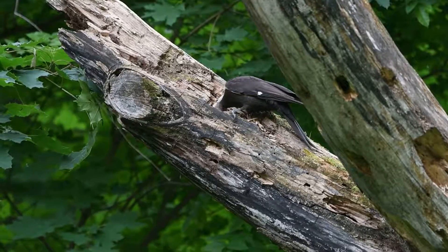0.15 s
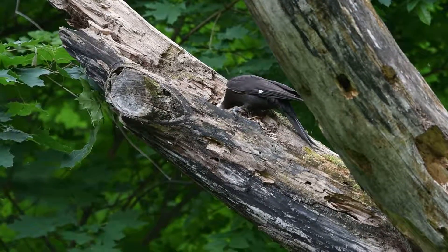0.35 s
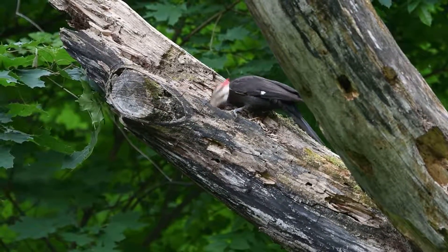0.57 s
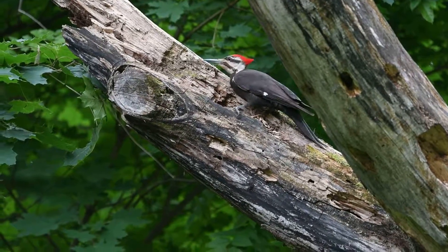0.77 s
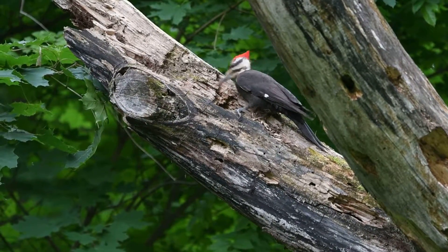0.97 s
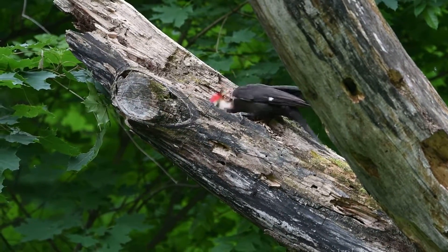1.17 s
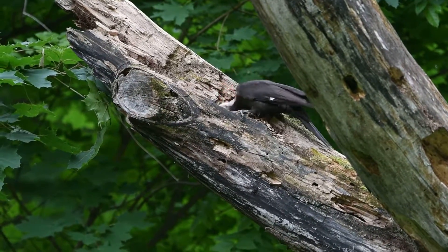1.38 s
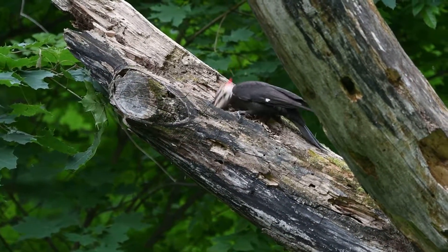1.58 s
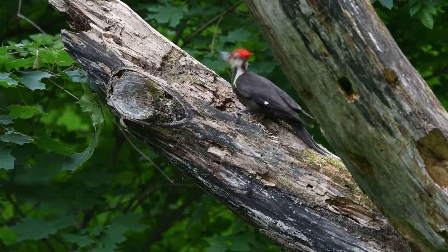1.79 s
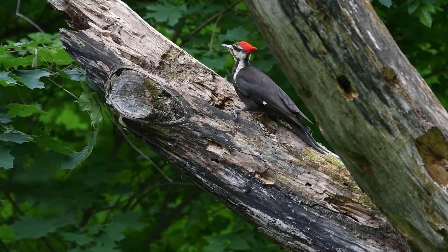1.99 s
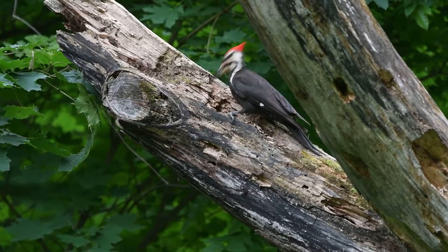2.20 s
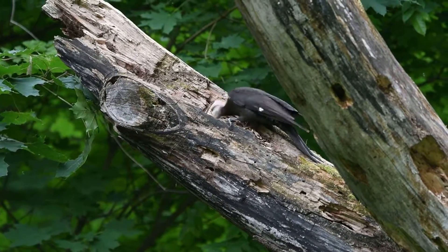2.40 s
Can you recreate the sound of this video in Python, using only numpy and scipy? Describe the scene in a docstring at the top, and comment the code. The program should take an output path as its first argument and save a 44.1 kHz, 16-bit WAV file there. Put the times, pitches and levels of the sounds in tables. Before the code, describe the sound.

Sparse, soft woodpecker pecks on dead wood follow a brief crackle and a much louder sharp snap, close on the right. Behind them lie quiet forest leaf hiss, a faint distant engine hum and thin bird whistles.

```python
"""Woodpecker on a dead trunk

In a quiet forest a woodpecker gives a hollow trunk one firm knock and a few light taps, prying at the
loose wood. Before that, something small and dry creaks and snaps right beside the right microphone.
Farther out lie a low rumble, a faint engine hum, leaf hiss and whistling birds."""
import sys
import numpy as np
from scipy import signal
from scipy.fft import rfft, irfft
from scipy.io import wavfile

SR = 44100
rng = np.random.default_rng(int(sys.argv[2]) if len(sys.argv) > 2 else 0)


def file_out(sig):
    """Save sig as 16-bit WAV at sys.argv[1]."""
    # one column per channel
    cols = np.atleast_2d(sig).T
    # limit, then scale
    lim = np.clip(cols, -1, 1)
    pcm = np.round(lim * 32767).astype(np.int16)
    wavfile.write(sys.argv[1], SR, pcm)


N = 108045

# echo among the trees (frequency [Hz], t60 [s])
FOREST_T60 = [(200, 0.12), (1500, 0.7), (6000, 0.42), (14000, 0.062)]


def amp(db):
    """Decibels to gain."""
    return 10 ** (np.asarray(db) / 20)


def unit(x):
    """Scales to rms 1."""
    return x / np.sqrt(np.mean(x ** 2) + 1e-20)


def read(points, hz):
    """Reads a table along log frequency."""
    f, value = np.transpose(points)
    return np.interp(np.log(hz + 1), np.log(f + 1), value)


def add(mix, start_s, sound):
    """Mixes a sound in at its start time."""
    part = mix[:, max(round(start_s * SR), 0):][:, :sound.shape[-1]]
    part += sound[..., :part.shape[1]]


def noise(tone, size):
    """Two unrelated channels of noise with the given tone, at rms 1."""
    hz = np.fft.rfftfreq(size, 1 / SR)
    return unit(irfft(rfft(rng.standard_normal((2, size))) * amp(read(tone, hz)), size))


def drift(rate_hz, size):
    """Random wandering of rms about 1."""
    hz = np.fft.rfftfreq(N, 1 / SR)
    return unit(irfft(rfft(rng.standard_normal(N)) * np.exp(-(hz / rate_hz) ** 2), N))[:size]


def strike(t, rise_s, decay_s):
    """Quick rise and exponential fall."""
    return (1 - np.exp(-t / rise_s)) * np.exp(-t / decay_s)


def mode(t, hz, t60, rise_s):
    """One struck resonance."""
    return strike(t, rise_s, t60 / np.log(1000)) * np.sin(2 * np.pi * hz * t)


def pecks(contact_rise_s=0.00037, thud_rise_s=0.0049):
    """The beak ticks on the surface, the dry outer wood clacks, and the hollow trunk thuds."""
    # beak on the trunk (time [s], tick [dB], clack [dB], thud [dB], thud brightness [dB/octave])
    blows = [(1.2108, -38.5, -45.5, -51, 15.5), (1.2159, -47.5, -55, -42, 4.5),
             (1.4100, -52, -43.5, -58.5, 6), (1.4453, -52, -53, -73, -8), (1.727, -53.5, -69, -58, 0),
             (1.798, -73, -66, -56.5, 11), (2.198, -72, -66, -59, 12), (2.3962, -54.5, -45.5, -58, 12)]
    # tone of the beak's tick (frequency [Hz], level [dB])
    tick_tone = [(300, -12), (700, -0.5), (1900, -2.5), (3400, 0.5), (4800, -4), (6300, 0.5), (9500, -10.5),
                 (12000, -20), (15000, -30)]
    # dry outer wood (frequency [Hz], level [dB], t60 [s])
    wood_modes = [(638, -4, 0.029), (1340, -8, 0.022), (1852, -3, 0.028), (2200, 0.5, 0.02)]
    # hollow trunk (frequency [Hz], level [dB], t60 [s])
    trunk_modes = [(270, 4.5, 0.11), (461.4, -5, 0.089), (501, 2.5, 0.061), (588, -8, 0.043)]
    out, t = np.zeros((2, N)), np.arange(SR // 6) / SR
    lowest_hz = trunk_modes[0][0]
    pan = amp([[-0.3], [0.3]])  # a hair right of centre
    for start_s, tick_db, clack_db, thud_db, tilt in blows:
        tick = amp(tick_db) * noise(tick_tone, len(t)) * strike(t, contact_rise_s, decay_s=0.0033)
        clack = sum(amp(clack_db + db) * mode(t, hz, t60, contact_rise_s) for hz, db, t60 in wood_modes)
        thud = sum(amp(thud_db + db + tilt * np.log2(hz / lowest_hz)) * mode(t, hz, t60, thud_rise_s)
                   for hz, db, t60 in trunk_modes)
        add(out, start_s, (tick + clack) * pan + thud)
    return out


def loose_fibres(grain_db=4.5):
    """Loose wood fibres crackle briefly as the beak pulls at them."""
    # pulls of the beak (time [s], length [s], level [dB])
    pulls = [(1.244, .06, -62.5), (1.425, 0.051, -63), (1.674, 0.076, -70)]
    # tone of the fibres (frequency [Hz], level [dB])
    fibre_tone = [(500, -10), (1600, 4), (3000, -4), (5000, -3), (6500, 5), (8500, -3), (15000, -20)]
    out = np.zeros((2, N))
    for start_s, length_s, db in pulls:
        size = int(length_s * SR)
        grains = unit(amp(grain_db * drift(rate_hz=470, size=size)))
        add(out, start_s, amp(db) * noise(fibre_tone, size) * grains * signal.windows.tukey(size, .5))
    return out


def close_clicks(ring_rise_s=0.00029):
    """A small dry thing crunches and rings by the right microphone; nearby surfaces scatter each click."""
    # dry clicks (time [s], ring [dB], ring brightness [dB/octave], crunch [dB])
    clicks = [(.1122, -47, -9, -37.5), (0.1463, -58, -13, -39.5), (0.156, -55, 2, -40), (0.16, -46, 5, -37),
              (0.1643, -36, -11.5, -27), (0.1876, -32, 2.5, -55), (.197, -9.5, -1, -29.5),
              (0.2073, -47.5, 27, -55)]
    # what they ring with (frequency [Hz], left [dB], right [dB], t60 [s])
    ring_modes = [(1144, -60, -44, 0.21), (1890, -38, -7.5, 0.015), (2070, -31, -14, 0.01),
                  (4080, -16.5, -10.5, 0.0082), (5280, -9.5, -16, 0.0052), (6450, -12.5, -7.5, 0.0058),
                  (6780, -20, 4.5, 0.0051), (8460, -21, -13.5, 0.0075), (10600, -19, -40, 0.0034)]
    # tone of the scattered reflections (frequency [Hz], level [dB])
    scatter_tone = [(500, -2), (1900, 10.5), (3200, 2.5), (6500, 1), (8800, -5), (11000, -34), (15000, -30)]
    # tone of the crunch (frequency [Hz], level [dB])
    crunch_tone = [(250, -21), (700, -6), (1350, 16), (2000, -21), (3500, -7), (6200, -10.5), (9000, -19),
                   (15000, -46)]
    out, t = np.zeros((2, N)), np.arange(SR // 10) / SR
    middle_hz = np.mean([row[0] for row in ring_modes])
    scatter_envelope = amp(-28) * strike(t, rise_s=0.0015, decay_s=0.0068)
    crunch_envelope = strike(t, rise_s=0.000056, decay_s=0.0013)
    scatter_pan, crunch_pan = amp([[0.5], [0]]), amp([[-19], [0]])
    for start_s, ring_db, tilt, crunch_db in clicks:
        ring = np.zeros((2, len(t)))
        for hz, left_db, right_db, t60 in ring_modes:
            gain = amp([[left_db], [right_db]]) * amp(tilt * np.log2(hz / middle_hz))
            ring += gain * mode(t, hz, t60, ring_rise_s)
        scatter = noise(scatter_tone, len(t)) * scatter_envelope * scatter_pan
        crunch = noise(crunch_tone, len(t)) * crunch_envelope * crunch_pan
        add(out, start_s, amp(ring_db) * (ring + scatter) + amp(crunch_db) * crunch)
    return out


def far_birds(waver=0.003, flutter_db=4, echo_db=-3):
    """Thin gliding whistles from far off, blurred by the trees."""
    # bird calls (time [s], length [s], start pitch [Hz], end pitch [Hz], level [dB])
    whistles = [(0.924, .12, 3310, 3000, -71.5), (1.06, .16, 3040, 2860, -72),
                (1.321, .10, 5160, 5070, -74), (1.384, 0.17, 4970, 4970, -69.5),
                (1.635, 0.057, 5000, 5000, -78), (1.822, 0.0132, 6550, 7600, -68)]
    out = np.zeros((2, N))
    for start_s, length_s, start_hz, end_hz, db in whistles:
        size = int(length_s * SR)
        hz = np.linspace(start_hz, end_hz, size) * (1 + waver * drift(rate_hz=60, size=size))
        envelope = amp(db + flutter_db * drift(rate_hz=36, size=size)) * signal.windows.tukey(size, .5)
        add(out, start_s, envelope * np.sin(2 * np.pi * np.cumsum(hz) / SR))
    return out + amp(echo_db) * forest_echo(out)


def far_engine(waver_hz=1.56):
    """Wavering tones of a distant engine swell and fade, alike at both microphones."""
    # engine tones (frequency [Hz], peak level [dB], loudest at [s], swell width [s])
    tones = [(81.5, -63.5, 1.4, 4), (193.7, -66, 1.08, 1.06), (233.1, -59, 1.35, 0.48),
             (520, -76, 1.04, 3.6)]
    out, t = np.zeros(N), np.arange(N) / SR
    for hz, db, peak_s, width_s in tones:
        swell = amp(db) * np.exp(-((t - peak_s) / width_s) ** 2 / 2)
        pitch_hz = hz + waver_hz * drift(rate_hz=3.93, size=N)
        out += swell * np.sin(2 * np.pi * np.cumsum(pitch_hz) / SR)
    return out


def forest_air(level_db=-53, wander_db=0.7):
    """Distant rumble shared by both microphones, and leaf hiss that differs between them."""
    # tone of the forest air (frequency [Hz], relative spectral density [dB])
    air_tone = [(15, -21), (30, -11.5), (50, -6.5), (82, -1), (115, -7.5), (165, -12.5), (260, -15),
                (370, -18), (510, -18), (720, -24.5), (1050, -27.5), (1800, -27.5), (3200, -32),
                (6400, -33.5), (9500, -37.5), (12000, -40), (15500, -44)]
    # likeness of the two microphones' signals (frequency [Hz], correlation [-1 to 1])
    likeness = [(60, 1), (150, 0.93), (300, 0.71), (520, 0.22), (1000, 0.22), (2000, -0.11), (3300, -0.055),
                (5300, 0.11), (12000, -0.063)]
    # lean to one side (frequency [Hz], left minus right [dB])
    balance = [(200, 0), (520, -2.5), (900, -1.5), (1800, -3.5), (3500, 0.5), (6400, -2), (8300, -1),
               (10000, 3.5), (12000, -0.5)]
    hz = np.fft.rfftfreq(N, 1 / SR)
    mid, side = rfft(rng.standard_normal((2, N)))
    spread = np.arccos(read(likeness, hz)) / 2
    mid, side = mid * np.cos(spread), side * np.sin(spread)
    lean = amp(read(balance, hz) / 2)
    spectrum = np.array([(mid + side) * lean, (mid - side) / lean]) * amp(read(air_tone, hz))
    return unit(irfft(spectrum, N)) * amp(level_db + wander_db * drift(rate_hz=1.7, size=N))


def forest_echo(sound):
    """The trees return a diffuse tail, each band dying at its own speed."""
    hz, t, bands = signal.stft(rng.standard_normal((2, SR // 2)), SR, nperseg=128)
    decay = np.exp(-np.log(1000) * t / read(FOREST_T60, hz)[:, None])
    tail = signal.istft(bands * decay, SR, nperseg=128)[1]
    return signal.fftconvolve(sound, tail / np.linalg.norm(tail[0]), axes=1)[:, :N]


def scene():
    """The forest at the microphones: the trunk echoes among the trees, the close clicks hardly at all."""
    woodpecker = pecks() + loose_fibres()
    clicks = close_clicks()
    echo = forest_echo(amp(-11.5) * woodpecker + amp(-37) * clicks)
    return woodpecker + clicks + echo + far_birds() + forest_air() + far_engine()


def record(dry, silence_s=0.035, fade_s=0.0019, cutoff_hz=15800):
    """The recorder notches two narrow bands, opens after a moment of silence and cuts the top treble."""
    # narrow dips in the recorder's response (frequency [Hz], width [Hz], depth [dB])
    notches = [(2601, 203, 24), (7670, 278, 22.5)]
    f = np.fft.rfftfreq(N, 1 / SR)
    dips_db = sum(depth_db * np.exp(-abs(f - hz) / width_hz) for hz, width_hz, depth_db in notches)
    notched = irfft(rfft(dry) * amp(-dips_db), N)
    fade_in = np.clip((np.arange(N) / SR - silence_s) / fade_s, 0, 1)
    lowpass = signal.firwin(511, cutoff_hz, window=("kaiser", 9), fs=SR)
    return signal.oaconvolve(notched * fade_in, lowpass[None], "same")


dry = scene()
out = record(dry)
file_out(out)
```